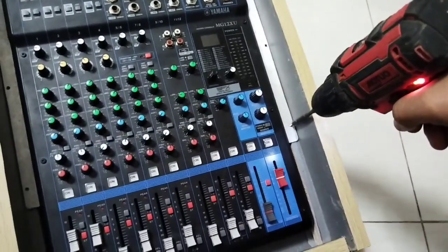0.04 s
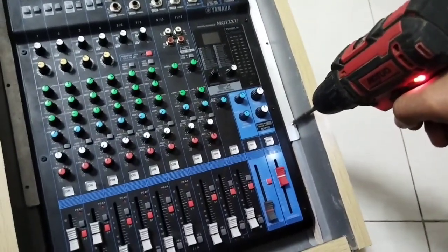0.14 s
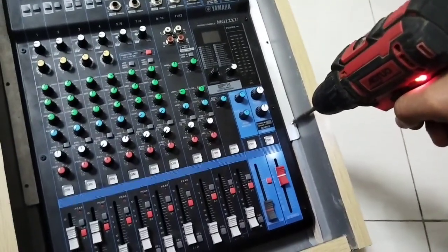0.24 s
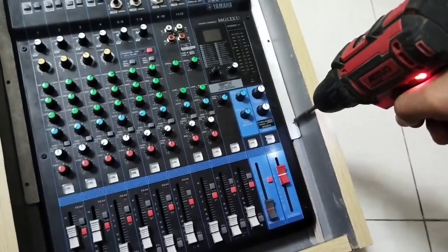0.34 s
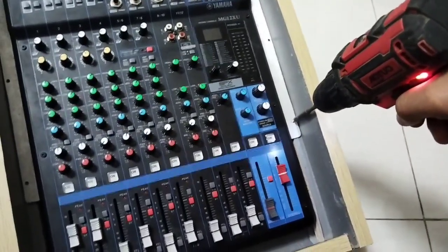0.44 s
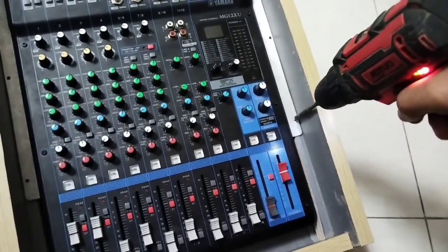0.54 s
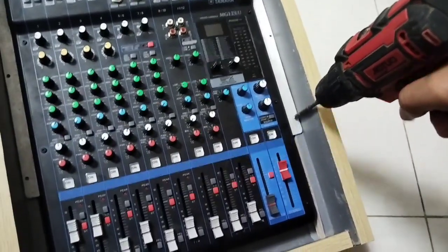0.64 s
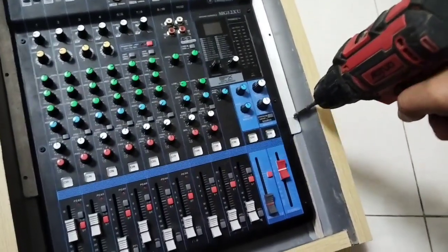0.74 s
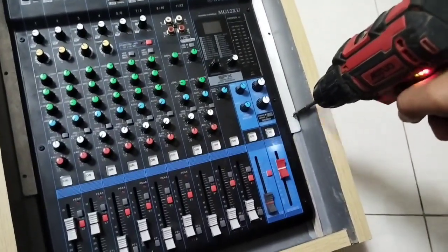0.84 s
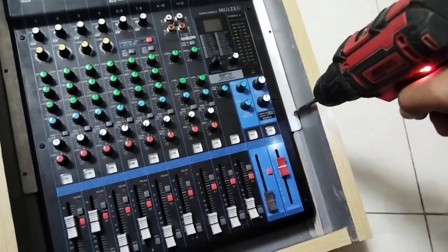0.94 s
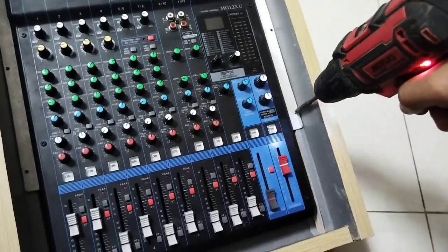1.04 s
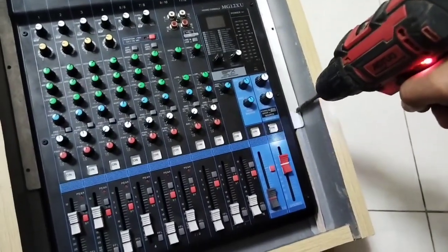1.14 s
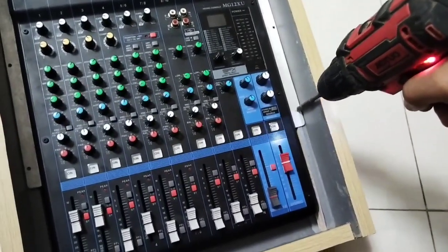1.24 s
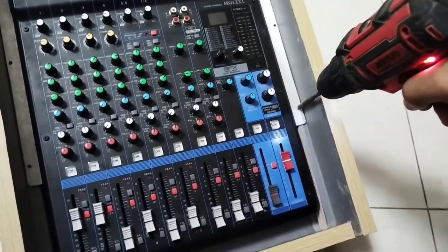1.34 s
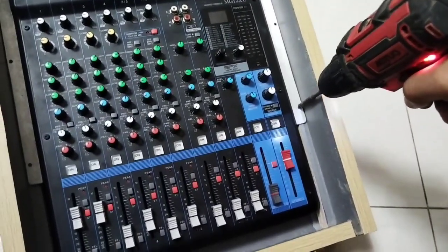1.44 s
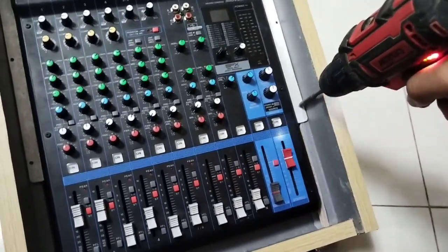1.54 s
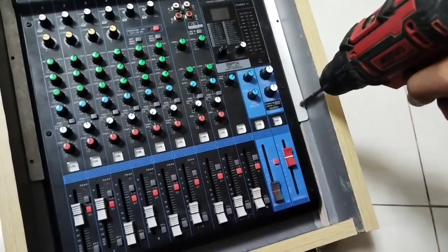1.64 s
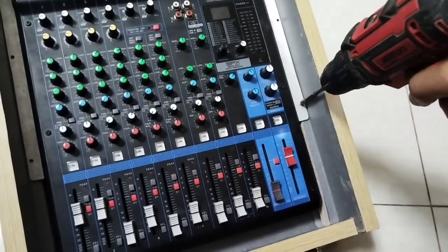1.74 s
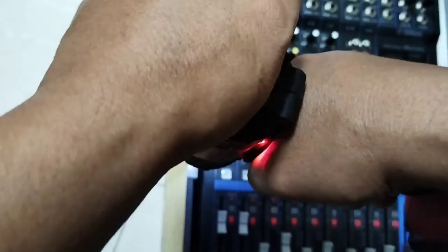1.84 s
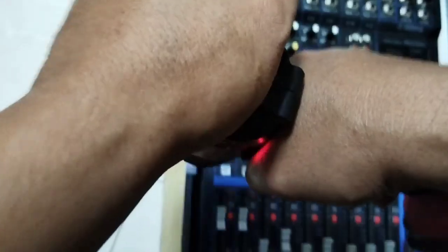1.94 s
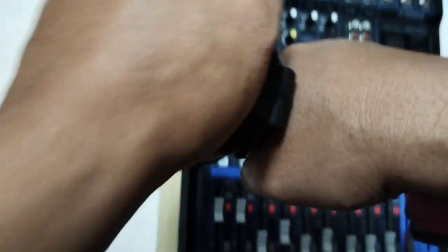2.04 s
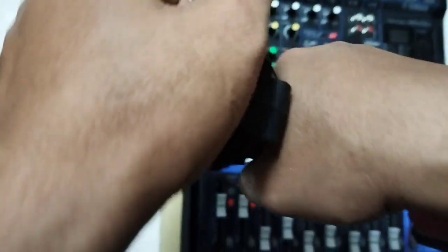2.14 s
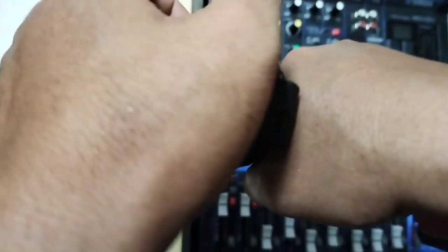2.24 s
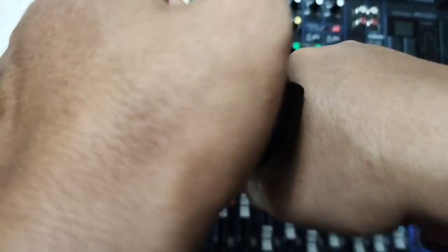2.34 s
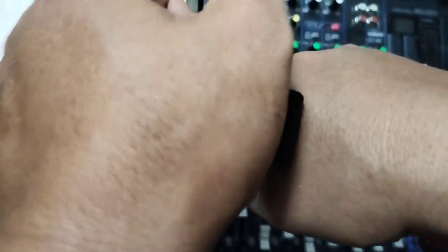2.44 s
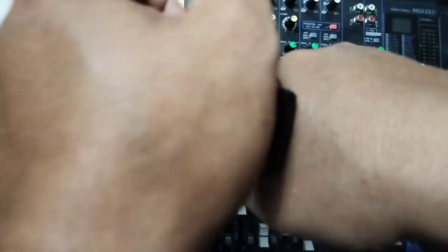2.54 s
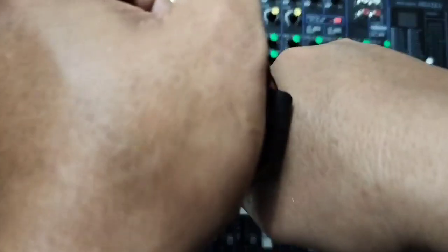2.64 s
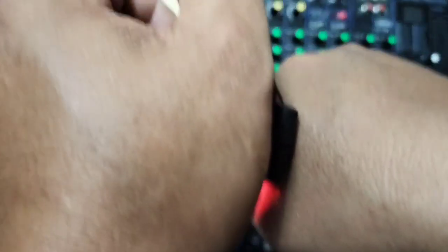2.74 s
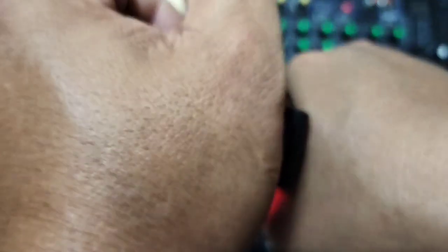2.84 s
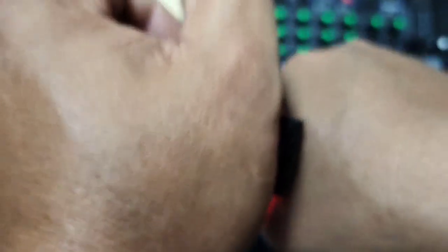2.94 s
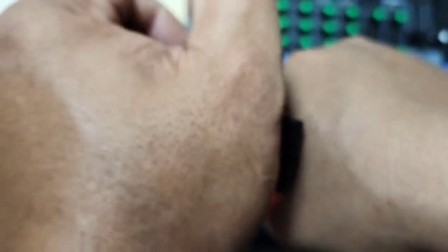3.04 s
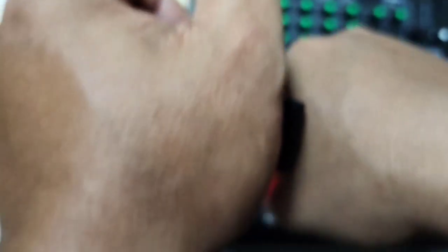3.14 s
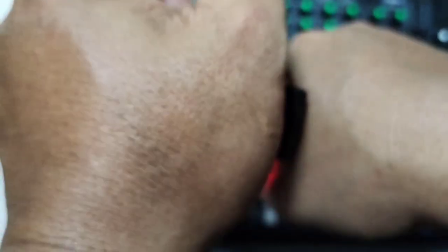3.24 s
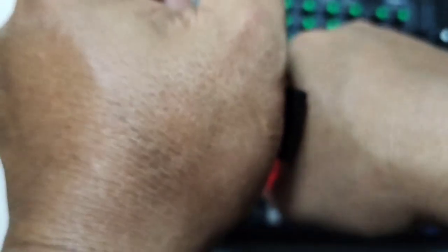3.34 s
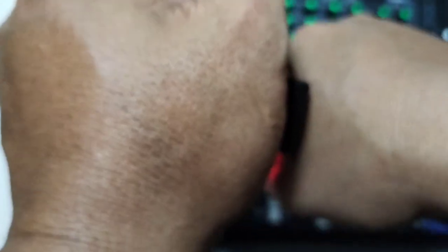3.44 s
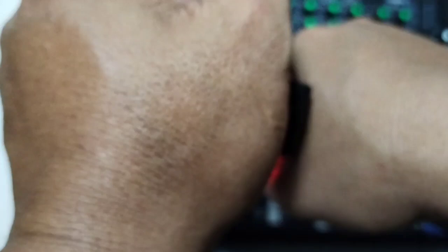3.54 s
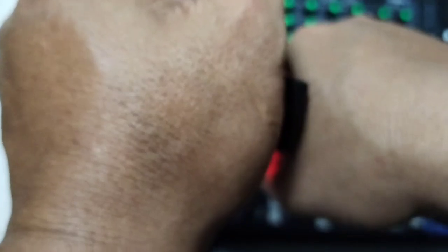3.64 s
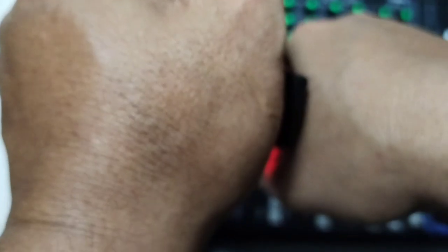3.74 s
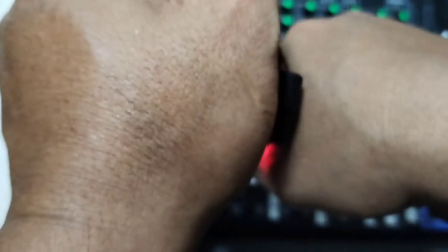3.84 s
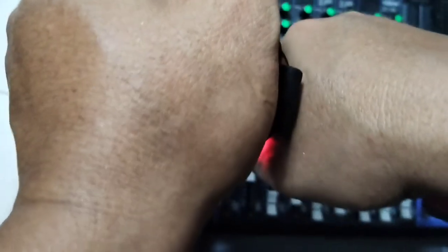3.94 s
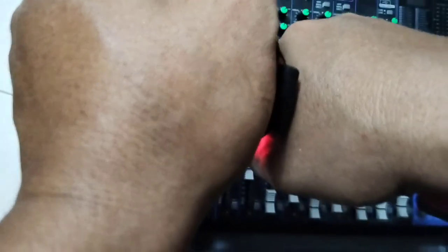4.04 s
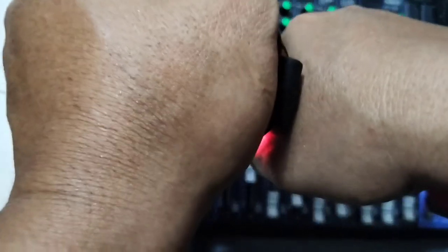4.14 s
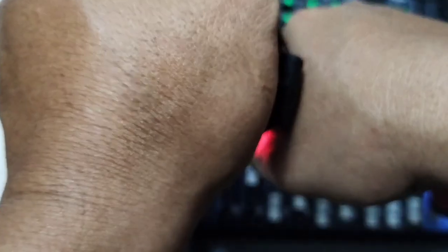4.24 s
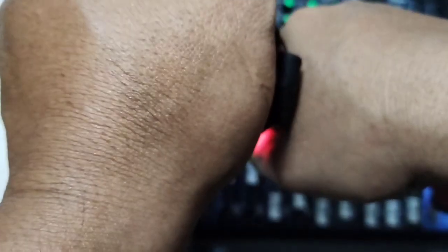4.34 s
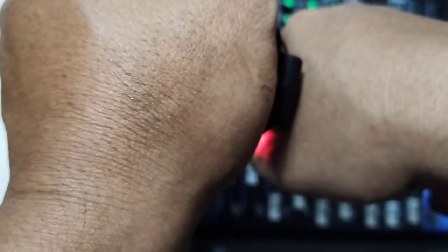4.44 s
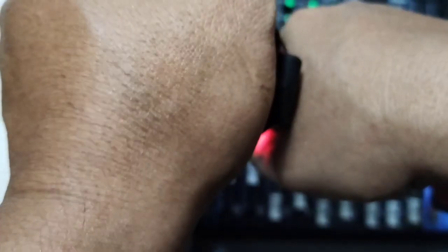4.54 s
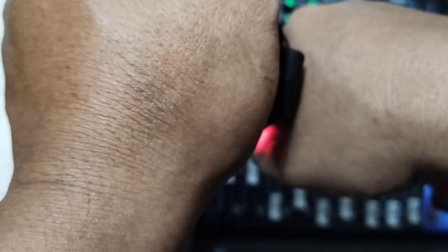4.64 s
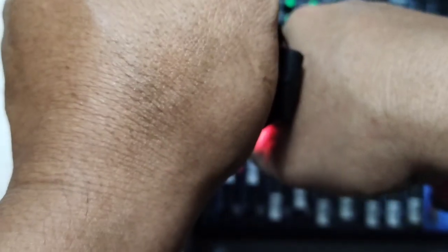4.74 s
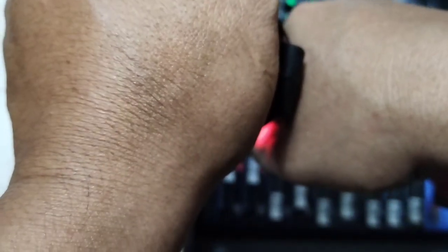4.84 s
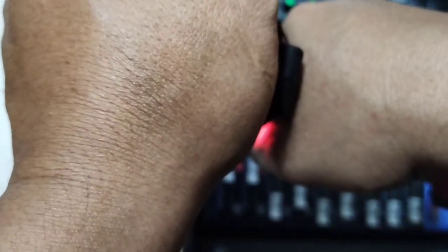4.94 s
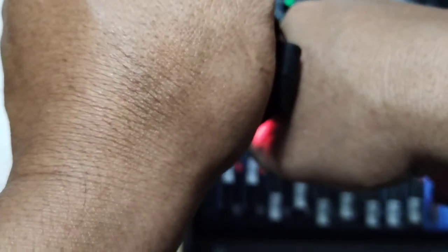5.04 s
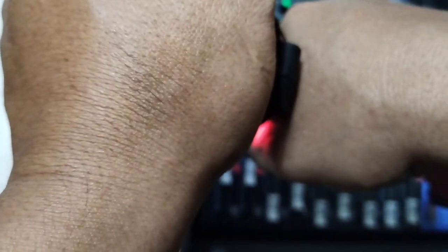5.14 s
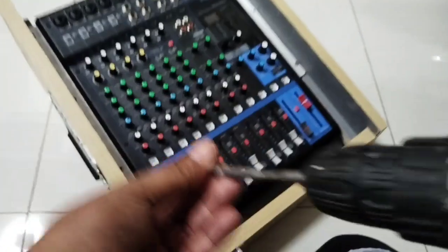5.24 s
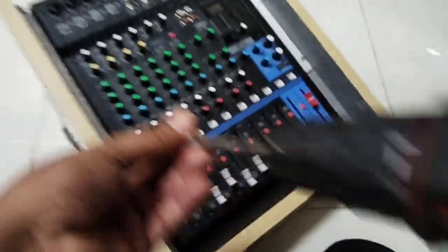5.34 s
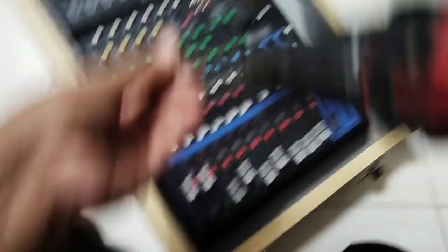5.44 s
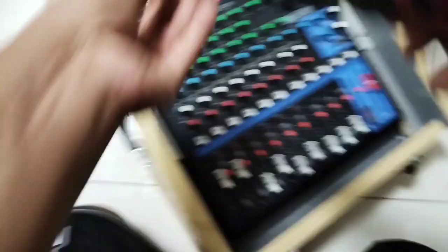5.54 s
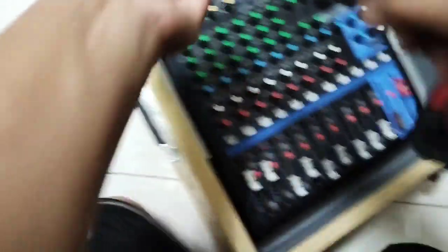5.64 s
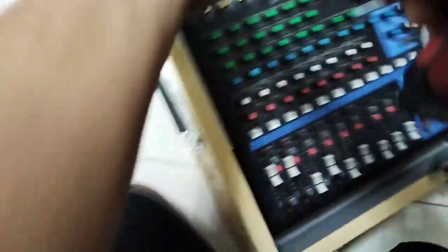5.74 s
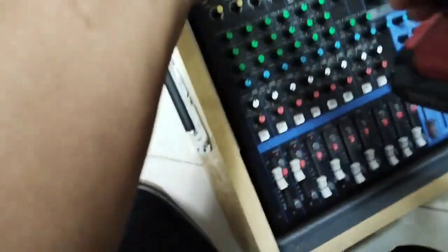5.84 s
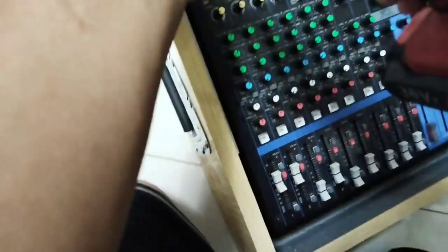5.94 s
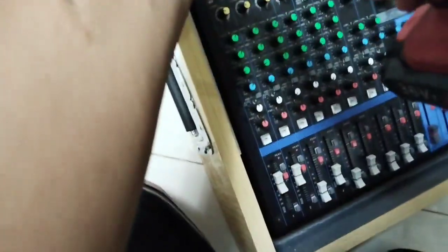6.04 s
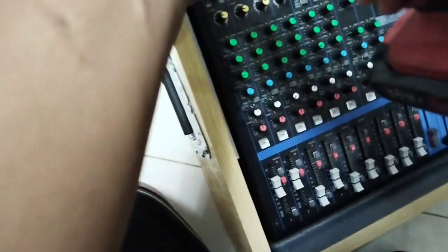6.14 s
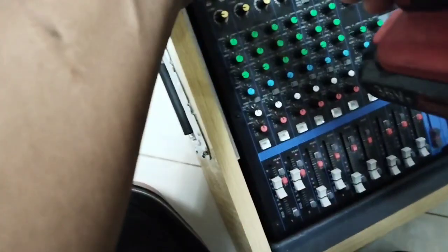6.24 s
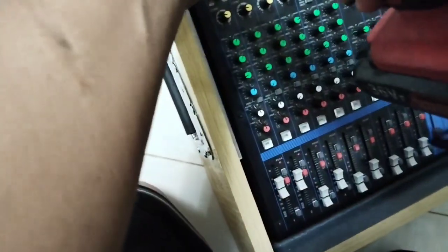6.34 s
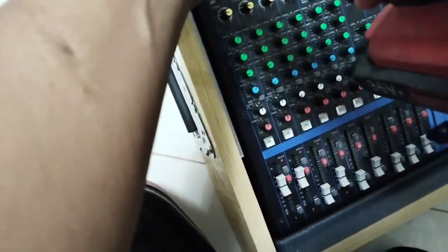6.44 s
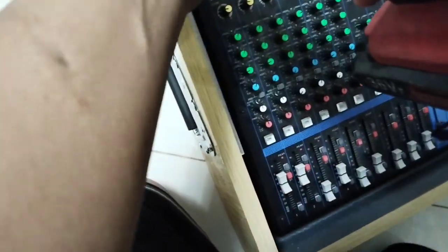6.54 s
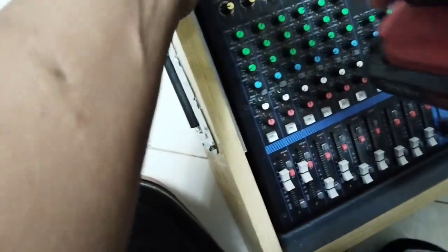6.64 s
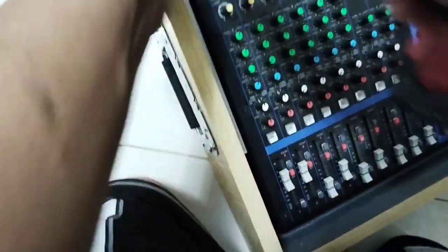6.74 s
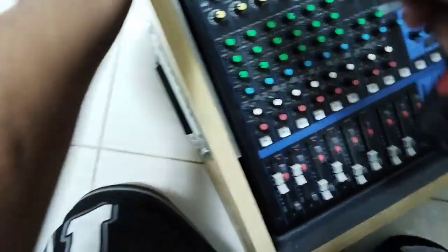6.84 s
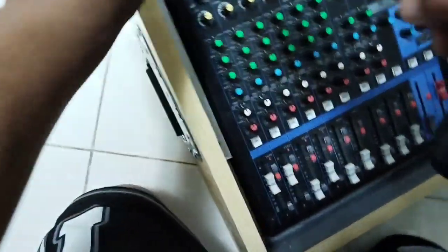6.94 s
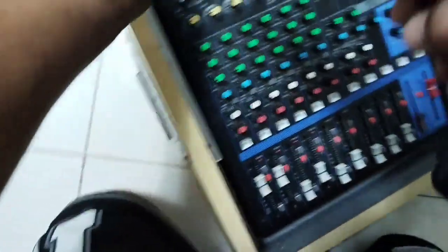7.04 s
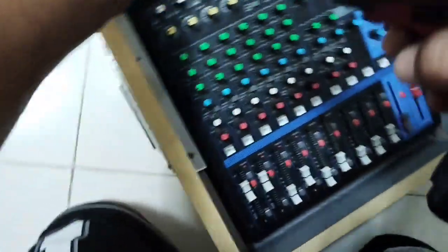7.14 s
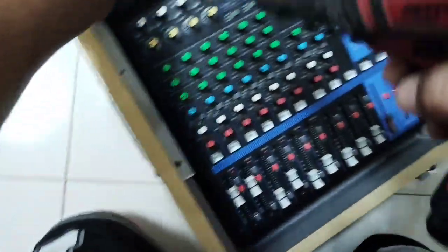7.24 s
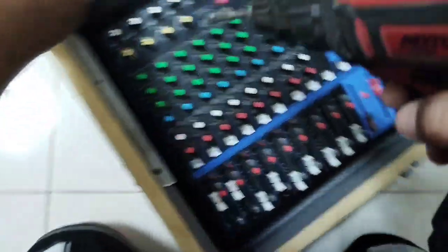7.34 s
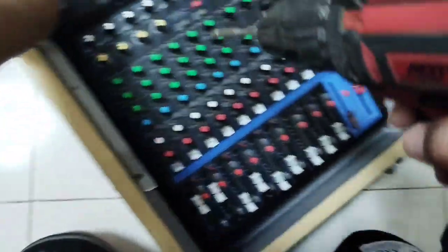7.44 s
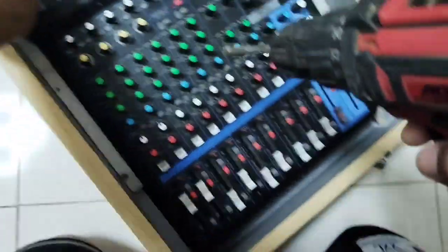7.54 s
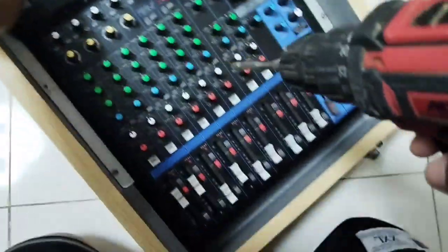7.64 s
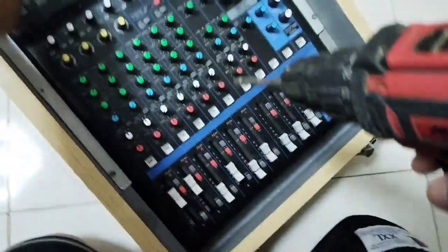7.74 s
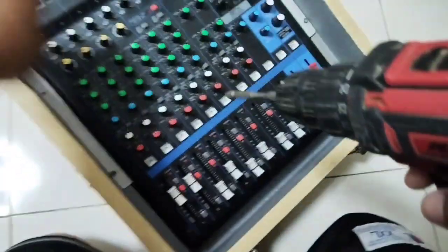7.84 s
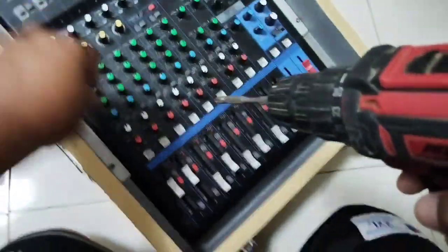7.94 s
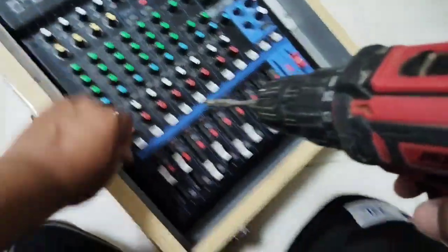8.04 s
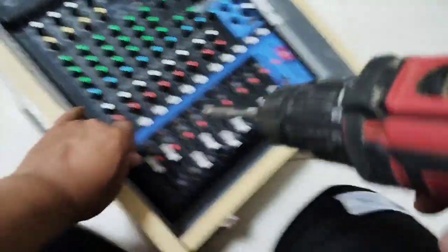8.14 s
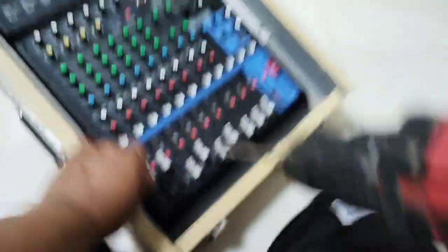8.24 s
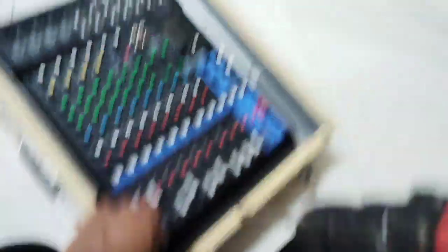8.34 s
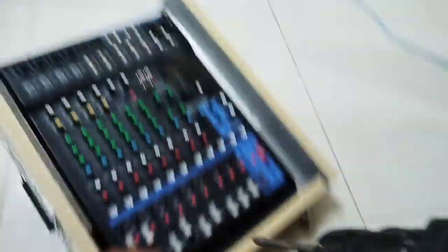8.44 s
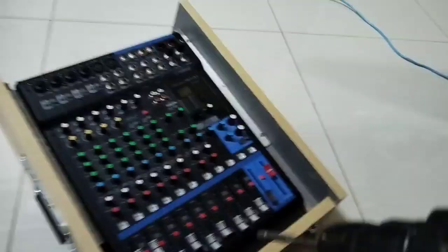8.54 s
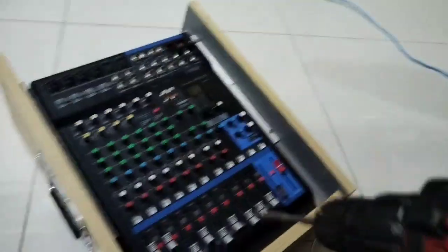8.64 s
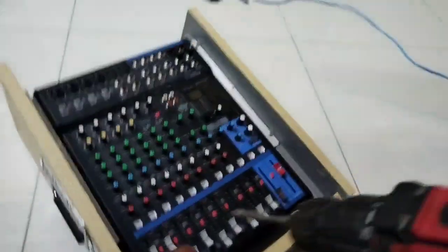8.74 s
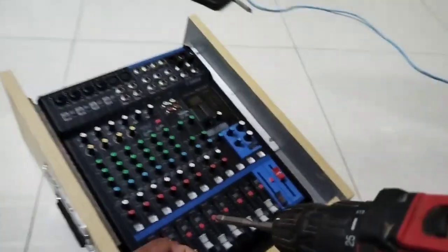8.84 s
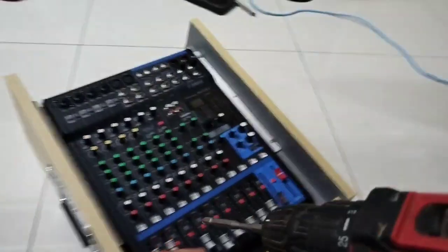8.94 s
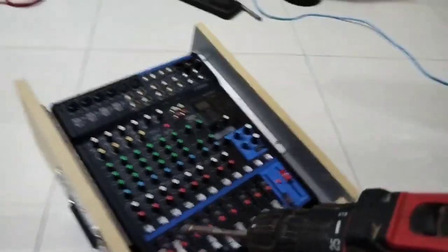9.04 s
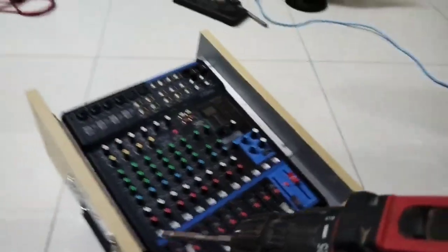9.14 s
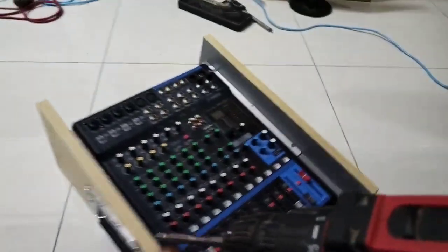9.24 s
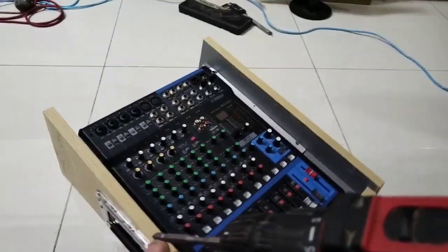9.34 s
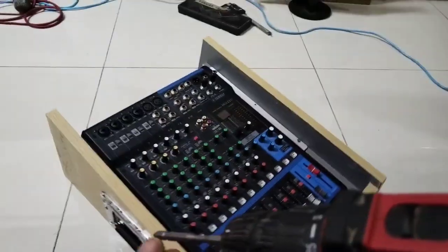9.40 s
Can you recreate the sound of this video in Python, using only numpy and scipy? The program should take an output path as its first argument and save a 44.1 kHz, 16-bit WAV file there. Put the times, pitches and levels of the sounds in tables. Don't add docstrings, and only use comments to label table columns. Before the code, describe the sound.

Close in a small tiled room, a cordless drill is already whirring, brakes, then spins up slowly and stops. The view jumps and the motor labours, the bit slipping with hard knocks. After a pause a sharp bite starts a long steady drive with a thin trigger whine, cut off abruptly. Then quiet handling: rustle, clicks, clatter and soft bumps over faint hum.

```python
import sys
import numpy as np
from scipy import signal
from scipy.fft import rfft, irfft, next_fast_len
from scipy.io import wavfile
from scipy.ndimage import uniform_filter1d

SR = 44100
rng = np.random.default_rng(int(sys.argv[2]) if len(sys.argv) > 2 else 0)


def convert_level_to_amplitude(level_db):
    exponent = np.asarray(level_db, float) / 20
    return 10 ** exponent


def master_out(mix):
    frames = np.transpose(np.atleast_2d(mix))
    ceiling = np.clip(frames, -1, 1)
    pcm = np.round(ceiling * 32767).astype(np.int16)
    wavfile.write(sys.argv[1], SR, pcm)


N = 417627


def rms_one(x):
    return x / np.sqrt(np.mean(x ** 2) + 1e-20)


def columns(rows, t):
    s, *cols = np.transpose(rows)
    opening = np.clip((t - s[0]) / 0.0041 + 1, 0, 1)
    closing = np.clip((s[-1] - t) / 0.0057 + 1, 0, 1)
    return opening * closing, [np.interp(t, s, c) for c in cols]


def on_log(points, at):
    x, y = np.transpose(points)
    return np.interp(np.log(np.maximum(at, 1)), np.log(x), y)


def coloured(x, spectrum):
    size = next_fast_len(x.shape[-1], real=True)
    hz = np.arange(size // 2 + 1) * SR / size
    return irfft(rfft(x, size) * convert_level_to_amplitude(on_log(spectrum, hz)), size)[..., :x.shape[-1]]


def band(x, kind, hz):
    return signal.sosfilt(signal.butter(2, hz, kind, fs=SR, output="sos"), x)


def drift(size, hz):
    slow = band(rng.standard_normal(size // 32 + 1002), "low", 32 * hz)[1000:]
    return np.interp(np.arange(size) / 32, np.arange(len(slow)), rms_one(slow))


def pair(size):
    alike_below_hz, bass_apart = 566, 0.58
    shared, *apart = rng.standard_normal((3, size))
    apart = np.array(apart)
    bass = band(shared, "low", alike_below_hz)
    return bass + bass_apart * apart + (1 - bass_apart) * band(apart, "high", alike_below_hz)


def panned(left_right_db):
    return convert_level_to_amplitude([[left_right_db / 2], [-left_right_db / 2]])


def swell(t, peak_s, peak_db, rise_s, fall_s):
    away = np.where(t < peak_s, (peak_s - t) / rise_s, (t - peak_s) / fall_s)
    return convert_level_to_amplitude(peak_db - 20 * away)


def while_on(source, start, end, table, t, *more):
    out, on = np.zeros(len(t)), (t > start - .05) & (t < end + .08)
    out[on] = source(table, t[on], *more)
    return out


# f/Hz, level/dB
AIR_COLOUR = [(15, -66.5), (25, -37), (127, -4), (166, -10.5), (363, -10), (416, -20), (489, -11),
              (575, -20.5), (1070, -29), (6210, -38.5), (7110, -29.5), (9840, -54.5), (11000, -35.5),
              (14400, -35), (16000, -49.5)]


def room_air():
    return convert_level_to_amplitude(-53 - 6.0) * rms_one(coloured(pair(N), AIR_COLOUR))


# f/Hz, level/dB, wobble/dB
HUM = [(119, -61, 5)]


def hum():
    t, out = np.arange(N) / SR, 0
    lag = np.array([[.3], [-.3]])
    for hz, level_db, wobble_db in HUM:
        out = out + convert_level_to_amplitude(level_db + wobble_db * drift(N, hz=10)) * np.sin(2 * np.pi * hz * t + lag)
    return out


# t/s, turn rate/Hz, gear and brush level/dB
RUNS = [
    [(0.0, 297, -17.5), (0.34, 298, -17.5), (0.55, 295, -17), (0.72, 283, -16.5), (0.765, 220, -19.5),
     (0.8, 156, -28)],
    [(1.0, 64, -61.5), (1.035, 90, -51.5), (1.044, 99, -40), (1.072, 117, -26), (1.16, 140, -21.5),
     (1.25, 186, -17.5), (1.38, 205, -18), (1.5, 254, -18.5), (1.6, 248, -17.5), (1.736, 213, -17.5),
     (1.79, 137, -32)],
    [(1.886, 237, -17), (2.0, 220, -17), (2.042, 224, -17), (2.065, 175, -22), (2.08, 260, -17.5),
     (2.11, 172, -25), (2.16, 195, -19.5), (2.197, 170, -21), (2.22, 150, -36), (2.28, 110, -42.5),
     (2.31, 101, -51)],
    [(2.87, 62, -61), (2.93, 84, -42), (2.97, 120, -25.5), (3.06, 136, -25.5), (3.19, 187, -17.5),
     (3.4, 223, -18), (3.7, 245, -17), (4.05, 249, -17), (4.6, 241, -17), (5.295, 233.5, -16.5)],
]
# f/Hz, level/dB per Hz
SIDE_ON = [(53, -53), (90, -24), (255, -24.5), (296, -0.5), (345, -16.5), (804, -20), (1140, -12),
           (1380, -15), (1750, -12.5), (2070, -9.5), (2600, 1.5), (3100, -7), (3450, -9.5), (3850, -10),
           (4550, -4), (7820, -8), (9300, -11.5), (11400, -11), (13700, -21), (15200, -21), (16000, -44.5)]
BEHIND = [(53, -51), (90, -16), (201, -42.5), (303, 5), (393, -12), (457, -5), (721, -16.5), (821, -10),
          (1570, -9), (2270, 2.5), (3050, -2), (3450, -5), (4000, 0.5), (5900, 3), (6800, -6.5),
          (8000, -0.5), (10000, -4), (11300, -5.5), (12100, -12.5), (12800, -15), (13700, -15),
          (15000, -20), (16000, -56.5)]
# multiple of turn rate, level against the hiss/dB
REPEAT = [(1, -12), (2, -8), (3, -8), (4, -8), (5, -11.5), (6, -8), (8, -11), (72, -20)]
# f/Hz, level/dB
BRUSH_LIFT = [(8000, -30), (10500, 12), (12500, 25), (14900, 26), (16000, 10)]
# multiple of turn rate, level against the hiss/dB, pitch wobble share
GEAR_MESH = [(9.35, -2.5, .012), (12, -4.5, .002)]
# f/Hz, width/Hz, level/dB
CASE_PANELS = [(323, 36, 0), (425, 160, -5)]


def case_boom(shake):
    boom = 0
    for hz, width, level_db in CASE_PANELS:
        r = np.exp(-np.pi * width / SR)
        poles = [1, -2 * r * np.cos(2 * np.pi * hz / SR), r * r]
        boom = boom + convert_level_to_amplitude(level_db) * rms_one(signal.lfilter([1, 0, -1], poles, shake))
    return boom


def motor(rows, t, colour, chatter_db):
    gate, (turns, gear_db) = columns(rows, t)
    turns = uniform_filter1d(turns, size=SR // 8)
    boom_db = -19 - 14 * np.log2(turns / 250) + 2.5 * drift(len(t), hz=15)

    orders = np.arange(1, 73)
    lines = np.zeros(2049, complex)
    line_db = on_log(REPEAT, orders) + rng.normal(0, 1.5, 72)
    lines[orders] = convert_level_to_amplitude(line_db) * np.exp(2j * np.pi * rng.random(72))
    one_turn = irfft(lines) * 2048
    phase = np.cumsum(turns * (1 + .0004 * drift(len(t), hz=10))) / SR % 1
    line_gain = np.sqrt(4 * turns / SR)
    same = np.interp(phase * 4096, np.arange(4096), one_turn) * line_gain
    chatter = coloured(same, BRUSH_LIFT) * convert_level_to_amplitude(chatter_db) * (turns / 250) ** 2
    for multiple, level_db, wobble in GEAR_MESH:
        teeth = np.cumsum(multiple * turns * (1 + wobble * drift(len(t), hz=40.1))) / SR
        same = same + convert_level_to_amplitude(level_db + chatter_db) * np.sin(2 * np.pi * teeth) * line_gain

    throb = 1 + 0.42 * np.sin(4 * np.pi * phase)
    hiss = rng.standard_normal(len(t)) * throb * convert_level_to_amplitude(2.08 * drift(len(t), hz=60))
    repeating = same * convert_level_to_amplitude(-0.5 + 3.4 * drift(len(t), hz=34.6))
    body = coloured(hiss + chatter + repeating, colour)
    body = body / np.std(band(body, "high", 2400))
    boom = case_boom(rng.standard_normal(len(t)) + convert_level_to_amplitude(-11) * same)
    return gate * convert_level_to_amplitude(gear_db - 4.0) * (body + convert_level_to_amplitude(np.minimum(boom_db, -8.0) - 8.5) * boom)


# multiple of turn rate, level against the gears/dB
TONES = [(1, -27), (2, -34), (3, -28), (4, -31.5), (6, -40)]
FAST_TONES = [(1, -14), (2, -29), (3, -24), (4, -23), (6, -18)]


def tones(rows, t):
    gate, (turns, gear_db) = columns(rows, t)
    table, slowest = (FAST_TONES, 235) if turns.max() > 265 else (TONES, 115)
    effort = uniform_filter1d(np.maximum(np.gradient(turns), 0) * SR, size=2000)
    effort_db = np.minimum(.019 * effort, 7.0)
    phase = 2 * np.pi * np.cumsum(turns * (1 + .004 * drift(len(t), hz=25))) / SR
    lines = sum(convert_level_to_amplitude(db + 3.5 * drift(len(t), hz=15)) * np.sin(k * phase) for k, db in table)
    lines = lines * np.clip((turns - slowest) / 50, 0, 1)
    lines = band(band(lines, "high", 280), "high", 280)
    return gate * convert_level_to_amplitude(gear_db + effort_db) * lines


def rubbing_noise():
    return pair(N) * convert_level_to_amplitude(1.5 * drift(N, hz=40))


# peak t/s, bright level/dB, dull
# level against bright/dB, rise/s, fall/s
RUSTLE = [(.9, -48, 4, .2, 0.14), (2.3, -53.5, 16.5, 0.12, .15), (5.34, -56.5, 12, 0.019, 0.43),
          (6.0, -68.5, 6, 0.49, 0.34), (6.697, -51.5, 0.5, 0.14, 0.12), (7.38, -68, 19.5, 0.4, 0.21),
          (7.797, -46.5, -20, .016, .05), (7.515, -58, 0, .012, .08), (7.64, -47, 2, 0.16, 0.13),
          (8.54, -50, 9, 0.26, 0.28), (8.79, -55.5, 14.5, .2, 0.26), (8.32, -58.5, 7, 0.084, 1),
          (9.25, -56.5, -14, 0.8, 0.073), (9.45, -60, 12, 0.44, .2)]
# f/Hz, level/dB per Hz
RUSTLE_COLOUR = [(530, -38.5), (900, -5.5), (1510, -0.5), (2120, 0), (2660, -4.5), (9530, -5.5),
                 (11700, -5), (15100, -9.5), (16000, -26.5)]


def rustle(rubbing):
    t, out = np.arange(N) / SR, 0
    bright = rms_one(coloured(rubbing, RUSTLE_COLOUR))
    dull = rms_one(band(rubbing, "band", [200, 800]))
    for peak_s, bright_db, dull_db, rise, fall in RUSTLE:
        out = out + swell(t, peak_s, bright_db, rise, fall) * (bright + convert_level_to_amplitude(dull_db - 9.5) * dull)
    return out


# t/s, peak level/dB, f/Hz, t60/s
PINGS = [(0.762, -28, 660, .09), (1.19, -30, 470, .14), (1.742, -28, 620, .09), (0.9888, -42, 7300, .012),
         (1.0053, -38, 5000, .014), (1.0053, -39, 7500, .014), (1.0053, -44, 3500, .012),
         (1.0227, -40, 2800, .012), (1.0397, -31, 5000, .016), (1.0397, -38, 2000, .014),
         (1.0397, -37, 7600, .02), (2.867, -46, 4400, .01), (2.867, -46, 1400, .01),
         (2.867, -47, 7000, .01), (3.0435, -19, 4400, .012), (3.0435, -19, 6500, .012),
         (3.078, -22, 345, .3), (5.4135, -39, 2900, .02), (5.4145, -38, 5200, .025),
         (5.4145, -41, 8200, .02), (6.0195, -42, 1700, .012), (6.0225, -36, 1950, .01),
         (6.0232, -35, 7200, .01), (6.0232, -38, 5200, .012), (6.5335, -22, 5100, .02),
         (6.5335, -28, 3500, .015), (6.536, -28, 11500, .02), (1.115, -31, 1650, .08),
         (6.5955, -24, 13500, .015), (6.5955, -36, 8500, .3), (6.632, -27, 14000, .012),
         (6.8135, -35, 560, .025), (6.8135, -37, 290, .07), (6.8142, -42, 2400, .014),
         (7.553, -25, 1500, .03), (8.774, -37, 2900, .03), (8.9022, -27, 900, .016),
         (8.9022, -27, 2600, .012), (8.9024, -31, 5100, .012), (8.914, -38, 3100, .03)]


def pings():
    out = np.zeros((2, N + SR))
    age = np.arange(SR // 10) / SR - np.array([[.00002], [0]])
    for s, peak_db, hz, t60 in PINGS:
        at = round(s * SR)
        ring = convert_level_to_amplitude(peak_db - 60 * age / t60) * np.sin(2 * np.pi * hz * age)
        out[:, at:at + SR // 10] += ring * (age > 0)
    return out[:, :N]


# t/s, peak level/dB
JOLTS = [
    (0.764, -29),
    (1.745, -34),
    (2.081, -6),
    (2.143, -19),
    (2.188, -19.5),
    (3.042, -3),
]
# f/Hz, level/dB, t60/s
JOLT_MODES = [(308.5, -1, 0.15), (352, -3.5, .12), (282, -12, 0.086), (435, -8.5, 0.071), (620, -13, .05),
              (1060, -4.5, 0.023), (1330, 3.5, .02), (1700, -15.5, 0.022)]


def jolts():
    out, blows = np.zeros(N), np.zeros(N)
    for s, peak_db in JOLTS:
        blows[round(s * SR)] = convert_level_to_amplitude(peak_db - 10.5)
    blows = sum(np.roll(blows, round(k * .0033 * SR)) for k in range(3))
    blows = signal.lfilter(np.hanning(36) / 18, 1, blows + 1e-18)
    for hz, level_db, t60 in JOLT_MODES:
        r, w = convert_level_to_amplitude(-60 / (t60 * SR)), 2 * np.pi * hz / SR
        out += signal.lfilter([0, convert_level_to_amplitude(level_db) * np.sin(w)], [1, -2 * r * np.cos(w), r * r], blows)
    return band(out, "high", 260)


def strikes(rows):
    out, age = np.zeros((2, N + SR)), np.arange(SR // 4) / SR
    crack = 1 + 4.5 * convert_level_to_amplitude(-60 * age / .003)
    contact = np.minimum(age / 0.0011 + .2, 1)
    late = np.minimum(age / 0.0015, 1)
    for s, peak_db, dull_db, bright_db, t60, pan_db in rows:
        fade = convert_level_to_amplitude(-60 * age / np.clip(t60, .004, .4))
        fade = (fade + 1.3 * convert_level_to_amplitude(-60 * age / 0.0088)) * contact
        uneven = convert_level_to_amplitude(peak_db - 1.0 + 2.5 * drift(len(age), hz=152.3))
        rattle = rng.standard_normal(len(age)) * fade * uneven
        low_hz = np.clip(1100 * 2 ** (bright_db / 12), 700, 3000)
        sound = band(rattle, "band", [low_hz, 5500])
        sound += convert_level_to_amplitude(dull_db + 8.5) * band(rattle * late, "band", [200, 900])
        sound += convert_level_to_amplitude(bright_db - 10.5) * band(rattle * crack, "band", [4300, 16500])
        at = round(s * SR)
        out[:, at:at + len(age)] += sound * panned(pan_db)
    return out[:, :N]


# t/s, peak level/dB, dull level/dB, bright level/dB (both relative), left-right/dB
TICKS = [(0.9886, -38.5, 4, -8, 3), (1.0053, -39.5, -10, 11, -2), (1.0227, -35, -5, 3, 4),
         (1.0397, -31, -6, 5.5, 4), (2.8348, -42.5, -0.5, -0.5, 5), (2.8668, -41.5, 4, -6, 3),
         (5.4123, -33, -8.5, 2.5, 11), (6.0199, -38, -5, -2.5, 7), (6.5953, -33.5, -20, 15, 1),
         (6.61, -36.5, -22, 7.5, -0.5), (6.655, -36.5, -21, 2.5, 0), (6.546, -33.5, -16.5, -0.5, 1),
         (6.558, -35, -17, -3, 0), (6.632, -33, -20, 7, 0), (6.681, -42, -20, 11, 0),
         (6.814, -43, 2.5, -9, 5.5), (7.5506, -25.5, -25, 9, -1), (7.795, -48.5, -16, 3.5, 4.5),
         (8.2822, -49.5, -4, 13.5, 2), (8.561, -47, -4, -20, -1), (8.651, -43, -20, 7, 0),
         (8.661, -31, -15, -14, 0), (8.6751, -36.5, -12, 13, -7), (8.7192, -38, 4, 6, 0),
         (8.7651, -40.5, -13, 9, 0), (8.773, -38, -18, -6, 0), (8.795, -42, -15, 7, 0),
         (8.9019, -27.5, -20, -34, 12)]
KNOCKS = [
    (2.078, -17, -8, -5, 2),
    (3.0435, -12, -10, -3, 0),
]


def ticks():
    return strikes([(*row[:4], 0.044, row[4]) for row in TICKS + KNOCKS])


# start t/s, end t/s, level/dB
WHINE = [
    (1.024, 1.065, -43.5),
    (1.065, 1.745, -46),
    (1.886, 2.142, -46),
    (2.866, 2.94, -44),
    (2.94, 3.1, -45.5),
    (3.1, 3.4, -47),
    (3.4, 5.29, -39),
]
# multiple, level/dB
WHINE_ORDERS = [(1, 7), (2, -7), (3, -10), (4, -5.5)]
# t/s, f/Hz
WHINE_PITCH = [(1, 3130), (2.87, 3118), (3.3, 3108), (3.55, 3072), (4.4, 3072), (4.8, 3095), (5.3, 3095)]


def whine(span, t):
    start, end, level_db = span
    rise = np.clip((t - start) / 0.017 + 0.22, 0, 1) * (t > start - .01)
    fall = np.clip((end - t) / .02 + 1, 0, 1)
    flutter = convert_level_to_amplitude(2.0 * drift(len(t), hz=30))
    pitch = np.interp(t, *np.transpose(WHINE_PITCH)) * (1 + 0.003 * drift(len(t), hz=30))
    phase = 2 * np.pi * np.cumsum(pitch) / SR
    tone = sum(convert_level_to_amplitude(db) * np.sin(k * phase) for k, db in WHINE_ORDERS)
    return rise * fall * convert_level_to_amplitude(level_db - 2.0) * flutter * tone


# t/s, peak level/dB, t60/s
THUDS = [
    (2.27, -40.5, 0.23),
    (3.045, -41, 0.48),
    (5.29, -61.5, 0.2),
    (8.551, -41, 0.22),
    (8.598, -46, 0.16),
    (9.4, -57, 0.21),
]


def thuds():
    out, age = np.zeros(N + SR), np.arange(SR // 4) / SR
    for s, peak_db, t60 in THUDS:
        rumble = rms_one(band(rng.standard_normal(len(age)), "band", [55, 120]))
        fade = convert_level_to_amplitude(peak_db - 0.5 - 60 * age / t60) * np.minimum(age / 0.013, 1)
        at = round(s * SR)
        out[at:at + len(age)] += rumble * fade
    return out[:N]


# t/s, peak level/dB, dull level/dB, bright level/dB (both relative), t60/s
RATTLES = [(6.5332, -25.5, -12.5, 11, 0.41), (6.5957, -37, -25, 21.5, 0.47), (7.552, -21, -1.5, 3.5, 0.19),
           (7.5704, -56, 22, -23, 0.17), (8.649, -31, -8, -3.5, 0.3), (8.676, -31, -14, -1.5, 0.23),
           (8.7205, -33.5, -20, -8, 0.18), (8.7657, -32.5, -28, -4.5, 0.3), (8.9207, -34, -10, -12.5, 0.19),
           (9.362, -49, -29, -0.5, 0.32)]


def rattles():
    return strikes([(*row, 0.6) for row in RATTLES])


# peak t/s, level/dB, rise/s, fall/s, low f/Hz, high f/Hz
SQUEAK = (7.36, -65, .4, .25, 2100, 3100)


def squeak(rubbing):
    *move, low_hz, high_hz = SQUEAK
    return swell(np.arange(N) / SR, *move) * rms_one(band(rubbing, "band", [low_hz, high_hz]))


# f/Hz, lead/rad
LEADS = [
    [(0, 0), (950, 0.3), (2240, 8.6), (4740, 10.2), (7150, 23.8), (8790, 31.9), (12700, 33), (16100, 31)],
    [(650, 0.1), (1120, 3.9), (2840, 5.5), (3900, 2.4), (5680, 1.5), (8870, -3.7), (13500, -25.4),
     (16100, -29.6)],
    [(0, 0), (2000, 1.0), (16000, 2.0)],
]
# f/Hz, t60/s
ROOM_T60 = [(100, 0.6), (1000, 0.3), (6000, 0.23), (15000, 0.21)]


def room(x, lead, room_db):
    size = x.shape[1]
    age, tail = np.arange(SR // 3) / SR, 0
    noise = np.array([pair(len(age)), pair(len(age))])
    for low in 80 * 2.0 ** np.arange(8):
        high = min(2 * low, .45 * SR)
        tail = tail + band(noise, "band", [low, high]) * convert_level_to_amplitude(-60 * age / on_log(ROOM_T60, 1.4 * low))
    tail = band(tail, "high", 220) * np.clip(age / 0.0062 - .7, 0, 1)
    echo = convert_level_to_amplitude(room_db) * tail / np.sqrt(np.sum(tail ** 2) / 4)

    half = np.interp(np.arange(129) * SR / 256, *np.transpose(lead)) / 2
    path = np.roll(irfft(np.exp(1j * np.array([half, -half]))), 128, axis=1)
    direct = signal.fftconvolve(x, path, axes=1)[:, 128:128 + size]

    sway = 2 * np.pi * 0.8206 * np.arange(size) / SR + 0.93 * drift(size, hz=3.27)
    shares = [np.cos(sway), np.sin(sway)]
    wet = sum(signal.fftconvolve(x * share, e, axes=1) for share, e in zip(shares, echo))
    return direct + np.pad(wet, ((0, 0), (0, 128)))[:, 128:128 + size]


# f/Hz, left-right/dB
SIDES = [
    [(60, 0), (130, 1.5), (290, -1), (640, 4), (1410, -2), (3100, 2), (6820, 3), (15000, -1)],
    [(60, 2.5), (130, 0.5), (290, -0.5), (640, 2.0), (1410, 0), (3100, 2), (6820, 2.5), (15000, -0.5)],
    [(60, 0.5), (240, 2), (950, 1.5), (3770, 0), (15000, 0.0)],
]


def between_ears(x, sides):
    half = np.array(sides) * [1, .5]
    return np.array([coloured(x[0], half), coloured(x[1], half * [1, -1])])


def dipped(x):
    away = (np.arange(N) / SR - 6.5915) / .0025
    return x * (1 - .75 * np.exp(-away ** 2))


CUTS_S = [0, 1.886, 5.29, 9.47]
# left-right/dB, room level/dB
VIEWS = [(0.1, 4), (0.1, 3), (.1, -4)]
FELT_DB = [-1, 4.5, 0]
CHATTER_DB = [-8, 1.5, 0]
WHINE_STRAIGHT = [1.0, 0, 0]


def scene():
    run_in = SR // 4
    playing = [(RUNS[:2], WHINE[:2], SIDE_ON), (RUNS[2:], WHINE[2:], BEHIND), ([], [], None)]
    rubbing = rubbing_noise()
    jolt = jolts()
    close = ticks() + pings()
    close_room_share = 0.34
    touches = close_room_share * close + rattles() + 0.27 * jolt
    out = room_air() + hum() + rustle(rubbing) + squeak(rubbing)
    out = out + jolt + thuds() + (1 - close_room_share) * close

    for view, (runs, whines, colour) in enumerate(playing):
        start, end = CUTS_S[view], CUTS_S[view + 1]
        (pan_db, room_db), felt_db, straight = VIEWS[view], FELT_DB[view], WHINE_STRAIGHT[view]
        a, b = round(start * SR), min(round(end * SR), N)
        t = np.maximum(np.arange(a - run_in, b) / SR, start + 0.016)
        drill, switch, felt = np.zeros((3, len(t)))
        for rows in runs:
            first, last = rows[0][0], rows[-1][0]
            drill = drill + while_on(motor, first, last, rows, t, colour, CHATTER_DB[view])
            felt = felt + while_on(tones, first, last, rows, t)
        for span in whines:
            switch = switch + while_on(whine, *span[:2], span, t)
        drill = drill + (1 - straight) * switch
        dry = drill * panned(pan_db) + np.pad(touches[:, a:b], ((0, 0), (run_in, 0)))
        felt = np.array([felt, np.roll(felt, 9)]) * convert_level_to_amplitude([[felt_db + 1.4], [felt_db - 1.4]])
        heard = between_ears(room(dry, LEADS[view], room_db), SIDES[view]) + felt + straight * switch
        fade_out = np.minimum(np.arange(b - a, 0, -1) / (.002 * SR), 1)
        out[:, a:b] += heard[:, run_in:] * fade_out
    return dipped(out)


def low_pass(x):
    return signal.sosfilt(signal.butter(12, 16500, fs=SR, output="sos"), x)


# f/Hz, level/dB
MICROPHONE = [(20, -10), (60, 0), (14300, 0), (15000, 3), (15300, 0), (15560, -27), (16500, -30)]


def record(dry):
    rounded = 1.308 * np.tanh(dry / 1.03)
    mix = coloured(rounded, MICROPHONE)
    return low_pass(mix)


dry = scene()
out = record(dry)
master_out(out)
```